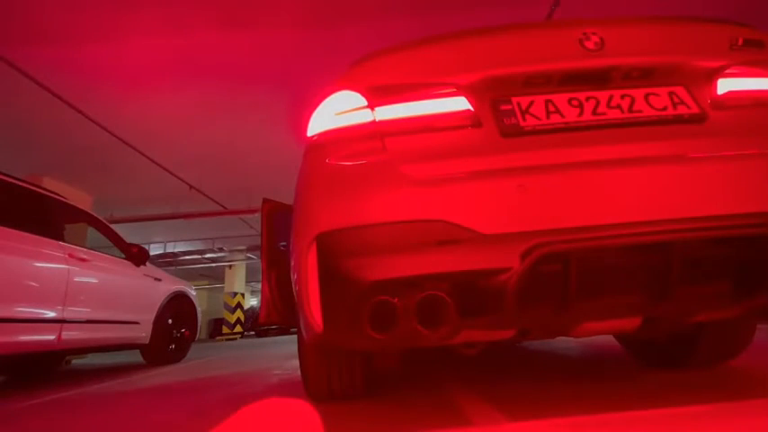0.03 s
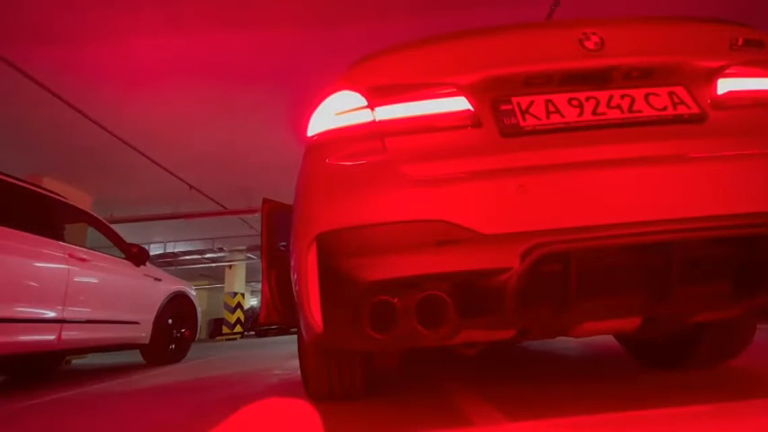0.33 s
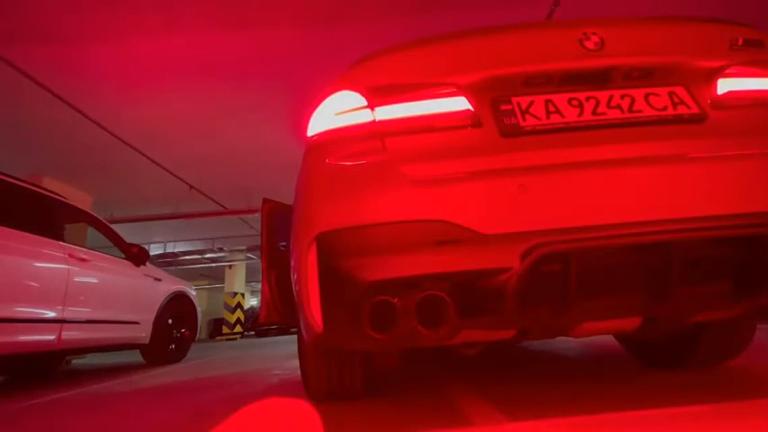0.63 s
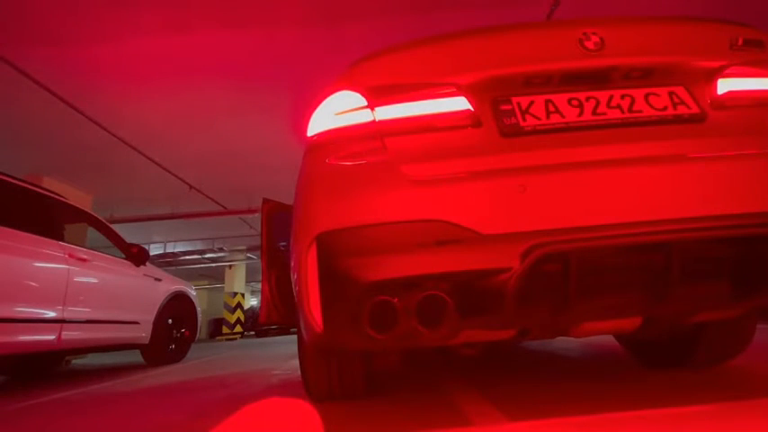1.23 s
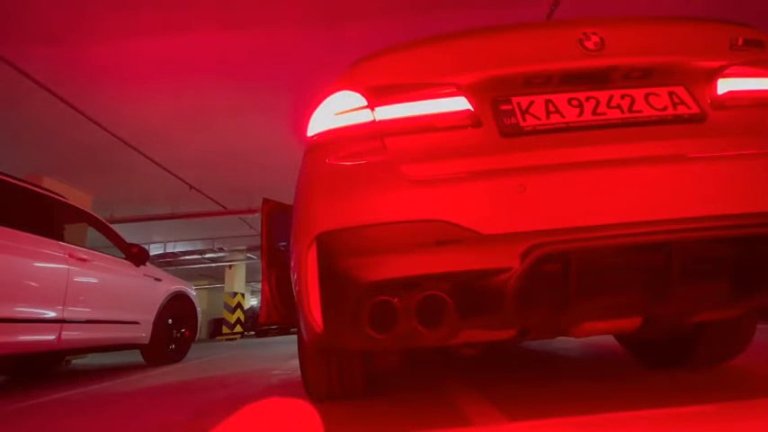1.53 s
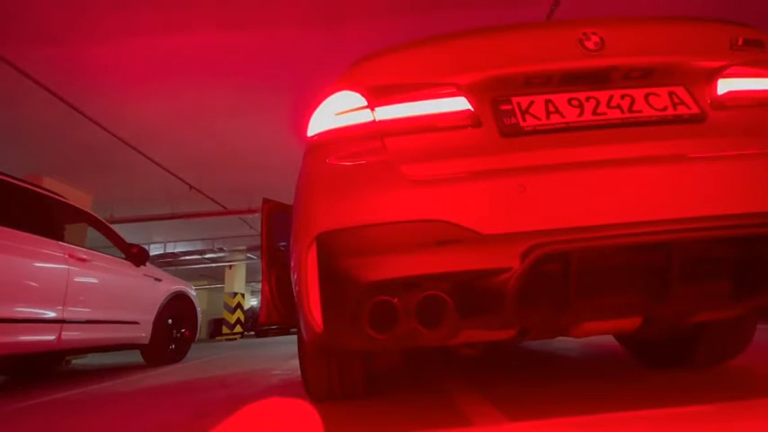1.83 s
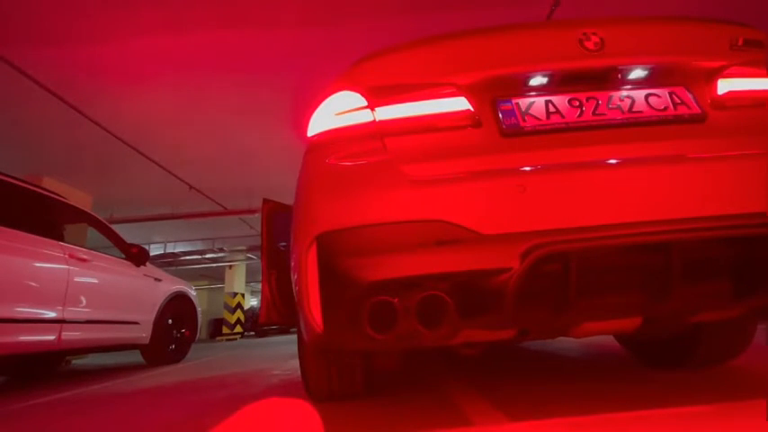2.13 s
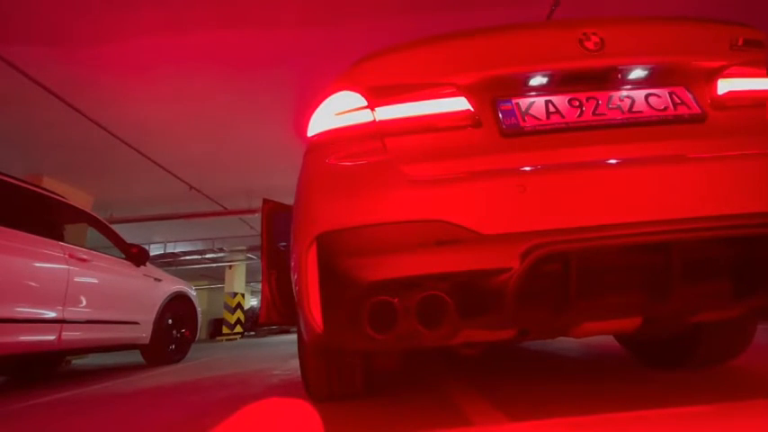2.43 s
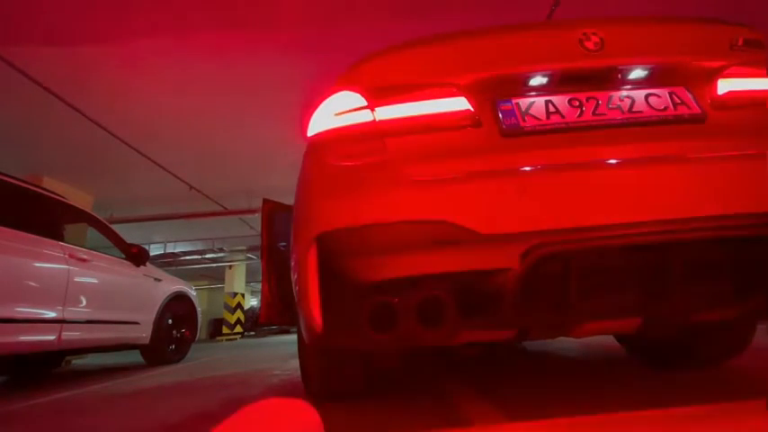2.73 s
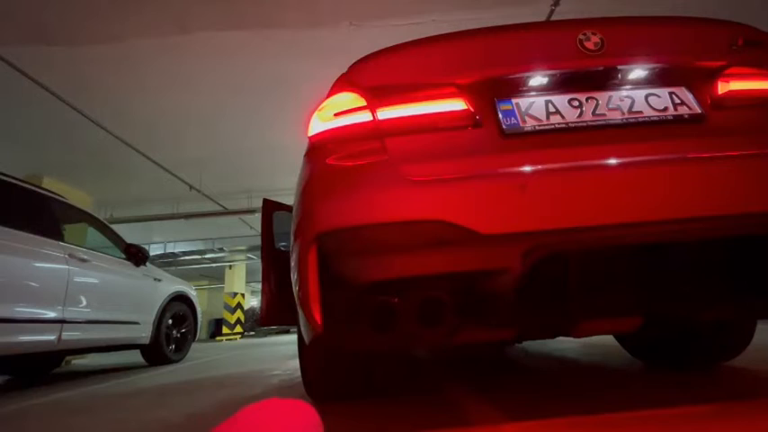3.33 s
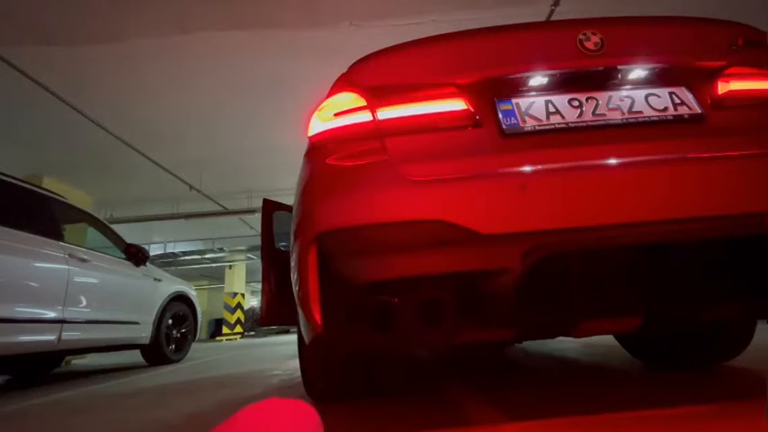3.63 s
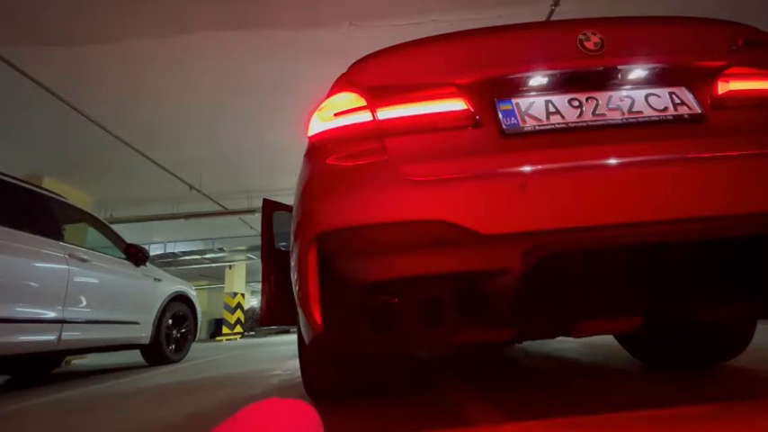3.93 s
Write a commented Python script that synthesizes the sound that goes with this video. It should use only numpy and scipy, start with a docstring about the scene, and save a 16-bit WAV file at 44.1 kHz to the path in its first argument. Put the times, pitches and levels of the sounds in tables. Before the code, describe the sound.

A car engine starts with a popping exhaust flare, then idles deeply in a car park.

```python
"""A V8 starts from cold in a concrete car park, heard from just behind its tailpipes.
Soft clunks sound in the car over faint ventilation. At 1.1 s the pinion clacks in; the starter whirrs
and compression strokes thump in the exhaust. Near 1.8 s the engine catches, coughing and popping.
The revs peak at 2.1 s, then sink to a loud, lumpy fast idle, each firing a pulse and a puff of gas.
Throughout, the low ceiling and walls answer and a limiter holds the peaks."""
import sys
import numpy as np
from scipy import signal
from scipy.fft import rfft, irfft, next_fast_len
from scipy.io import wavfile
from scipy.ndimage import uniform_filter1d, minimum_filter1d, map_coordinates

SR = 44100
rng = np.random.default_rng(int(sys.argv[2]) if len(sys.argv) > 2 else 0)


def inscribe(sig):
    """Save sig as 16-bit PCM at rate SR to the path in sys.argv[1].

    A 1-D sig is mono; a 2-D sig holds one channel per row.
    Samples are clipped to [-1, 1] before scaling.
    """
    pcm = np.round(np.clip(np.atleast_2d(sig).T, -1, 1) * 32767)
    wavfile.write(sys.argv[1], SR, pcm.astype(np.int16))


N = 176400

BOOM_HZ, BOOM_T60_S, BOOM_ATTACK_S = 57.55, 0.23, 0.0069  # lowest pipe resonance
ANTIPHASE = np.array([[1], [-1]])  # left, right

# engine speed: time_s, firing_hz
FIRING_RATE = [(1.8, 56), (1.85, 79), (1.88, 88), (1.92, 89), (1.96, 111), (2.03, 129), (2.12, 139),
               (2.19, 135.5), (2.26, 129), (2.4, 116.5), (2.52, 109.7), (2.68, 103.8), (2.82, 103.4),
               (2.91, 100.7), (3.15, 100.1), (3.4, 97.6), (3.6, 96.2), (4, 95)]
# eight cylinders in firing order: bark_db, rasp_db, late_s
CYLINDER_FIRINGS = [(3.5, 5, 0.00025), (-10.5, 0.5, 0.00078), (1.5, 6.5, 0.002053), (-1, 1.5, 0.002826),
                    (-5, 4, 0.00063), (-9, 3.5, 0.00012), (-9, 4, 0.001486), (-6.5, -1, 0.000089)]
# once-per-cycle surge: time_s, depth_db
CHUG_DEPTH = [(2.45, -1.5), (2.7, 0.5), (3.35, 4.5), (3.7, 1), (4, -0.5)]
# exhaust envelopes, each relative to its layer's gain: time_s, level_db
DRONE_LEVEL = [(1.78, -26), (1.84, -8), (1.93, -6.5), (2.2, -8), (2.42, -10), (2.55, -13.5), (2.7, -23.5),
               (3.0, -20), (3.25, -13), (3.5, -12), (4, -10)]
THROB_LEVEL = [(1.75, -38), (1.85, -35), (2.0, -24), (2.25, -21), (2.36, -23), (2.6, -17), (3.0, -17.5),
               (3.5, -18), (4, -22)]
BARK_LEVEL = [(1.66, -24.5), (1.75, -21), (1.79, -9.5), (1.84, -14), (1.97, -15.5), (2.06, -21),
              (2.24, -27), (2.39, -14.5), (2.59, -21), (3.0, -22), (4, -26.5)]
RASP_LEVEL = [(1.78, -11), (1.8, -23), (1.88, -17.5), (2.05, -25.5), (2.2, -31.5), (2.37, -24),
              (2.45, -19.5), (2.53, -29.5), (2.8, -24.5), (3.12, -25), (3.4, -27.5), (4, -27)]
HISS_LEVEL = [(1.76, -17.5), (1.78, -21.5), (1.85, -23.5), (1.91, -29), (2.1, -34), (2.2, -38),
              (2.46, -36.5), (2.53, -38), (2.84, -34.5), (4, -36.5)]
# engine-cycle harmonics: order, level_db
THROB_HARMONICS = [(3, -24), (4, -3), (5, 1), (7, 4.5), (9, -4.5)]
UPPER_HARMONICS = [(12, -10), (13, -11.5), (16, -2.5), (20, -4), (24, -8), (28, -12), (32, -15.5),
                   (36, -15), (40, -13), (43, -25), (48, -14.5)]
# exhaust spectra: freq_hz, gain_db
RUMBLE_SPECTRUM = [(20, -19), (36, -2), (48, -13), (62, 8), (85, -11.5), (200, -27.5), (600, -82)]
BARK_SPECTRUM = [(60, -89.5), (120, 4.5), (160, 2), (215, -2.5), (265, -9), (330, -6), (440, -7.5),
                 (490, -7), (530, -2.5), (595, -3.5), (680, -12.5), (850, -22), (1500, -61)]
RASP_SPECTRUM = [(400, -26), (850, -9), (950, -2.5), (1040, 5.5), (1130, -0.5), (1230, -3.5), (1420, -10.5),
                 (1550, -4.5), (1700, -11), (1900, -22), (2900, -21), (3400, -35), (6000, -43)]
HISS_SPECTRUM = [(900, -54.5), (2000, 1.5), (2900, 2.5), (3400, -4.5), (4300, 2), (5000, 2), (6200, 0),
                 (7500, -2), (10700, -3.5), (11500, -13), (12300, -20)]
# compression strokes and first firings: start_s, level_db
THUMP_EVENTS = [(1.085, -16), (1.155, -12.5), (1.248, -10), (1.262, -5.5), (1.337, -8.5), (1.41, -6),
                (1.485, -9), (1.549, -8.5), (1.616, 2), (1.674, 3), (1.713, 7.5), (1.752, 0), (1.78, 0.5),
                (1.797, -2.5)]
# hard firings as the engine catches: start_s, level_db
COUGH_EVENTS = [(1.574, -15), (1.703, -10), (1.827, -3), (1.843, -10), (1.891, -10), (1.944, -26),
                (1.974, -16), (2.107, -14)]
# tailpipe cracks: start_s, level_db
POP_EVENTS = [(1.762, -6), (1.853, -13), (1.874, -13), (1.896, -12), (1.949, -12), (1.985, -15),
              (2.428, -19), (2.435, -9), (2.470, -12), (2.58, -16), (2.620, -14), (2.638, -13.5),
              (2.697, -17), (2.715, -12), (2.7913, -9), (2.8688, -10), (2.892, -11.5), (2.95, -10.5),
              (3.0287, -12), (3.107, -18), (3.130, -11), (3.187, -12), (3.269, -10), (3.351, -13),
              (3.434, -14.5), (3.515, -11.5), (3.598, -14), (3.619, -20), (3.7662, -21), (3.787, -13.5),
              (3.809, -15.5), (3.933, -16)]
# starter gear whine: time_s, pitch_hz, level_db
GEAR_WHINE = [(1.04, 300, -59), (1.09, 323.4, -36), (1.2, 322.4, -22), (1.235, 368.5, -17.5),
              (1.265, 371.4, -25), (1.295, 346, -19), (1.32, 353.5, -40), (1.345, 385, -14.5),
              (1.38, 388, -21), (1.43, 403.8, -28), (1.51, 440, -27), (1.64, 381.4, -31.5),
              (1.7, 359.6, -32), (1.85, 389, -44)]
# starter whirr envelope: time_s, level_db
WHIRR_LEVEL = [(1.0, -72), (1.045, -55), (1.06, -30), (1.082, -17), (1.11, -23), (1.19, -27), (1.25, -25.5),
               (1.5, -27), (1.55, -29), (1.58, -26.5), (1.68, -29.5), (1.76, -29.5)]
# starter whirr spectrum: freq_hz, gain_db
WHIRR_SPECTRUM = [(60, -39), (100, 4.5), (190, -13), (370, -6.5), (510, -11.5), (660, -10.5), (880, -17.5),
                  (1240, -17), (2000, -18.5), (2830, -18.5), (3400, -21.5), (6200, -23), (11000, -25),
                  (14000, -44)]
# starter housing resonances: centre_hz, width_hz, gain_db
HOUSING_MODES = [(1016, 45, 2), (1520, 210, -2.5), (1940, 70, -1), (2526, 54, -4.5), (2890, 64, -7.5),
                 (6115, 140, 0)]
# knocks in the car: start_s, thud_db, latch_db
CLUNK_EVENTS = [(0.519, -49.5, -50), (0.676, -50.5, -66), (.705, -66, -58), (.94, -52.5, -60),
                (1.001, -37.5, -54)]
# knock and ventilation spectra: freq_hz, gain_db
THUD_SPECTRUM = [(30, -9), (70, 8), (130, 9), (220, -7.5), (440, -3), (560, -6.5), (750, -8), (1100, -25),
                 (3000, -33), (10000, -46)]
LATCH_SPECTRUM = [(250, -29), (440, 2), (540, -3), (660, -2), (820, -2), (1100, -24), (3000, -32),
                  (10000, -34)]
VENT_SPECTRUM = [(15, -37), (25, -4), (64, -0.5), (207, -15), (241, -25), (353, -34), (391, -21),
                 (545, -36), (5670, -46.5), (11000, -47), (14300, -71), (22000, -120)]
# floor-to-ceiling standing waves: centre_hz, width_hz, gain_db
ROOM_MODES = [(311.4, 9.7, 3.5), (343.7, 16, 6), (387.6, 7.1, 0.5), (442.3, 12.5, 3.5), (518.4, 13, -1),
              (593.6, 5.3, 3)]
# car park reverberation: freq_hz, t60_s
HALL_DECAY = [(100, 0.66), (1000, 1), (4000, 0.36), (11000, 0.59)]


def exhaust(firings):
    """Each firing sends a pulse and a puff of gas down the pipe: bark, rasp and hiss."""
    index = np.arange(np.ceil(firings[0]), firings[-1]).astype(int)
    bark_db, rasp_db, late_s = np.array(CYLINDER_FIRINGS)[index % len(CYLINDER_FIRINGS)].T
    jitter, bark_stray, rasp_stray = np.clip(rng.standard_normal((1024, 3)), -2, 2)[index].T
    start_s = np.interp(index, firings, np.arange(N) / SR) + late_s + .00008 * jitter
    unevenness = np.interp(start_s, [3.1, 3.7], [1, .45])  # cylinders even out at idle
    bark_pulses = impulses(start_s, unevenness * bark_db + 2.5 * bark_stray)
    rasp_pulses = impulses(start_s, rasp_db + 1.1 * rasp_stray)

    roughness = 0.51 + 2.4 * (1 - fade_in(2.07, 0.032))  # cold cylinders burn raggedly
    bark = coloured(unit_rms(bark_pulses) + roughness * puffs(bark_pulses, t60_s=0.03), BARK_SPECTRUM)
    bark = unit_rms(bark / np.sqrt(1 + roughness ** 2))
    bark *= amp(curves(BARK_LEVEL)[0] + 1) * fade_in(1.66, .02)

    rasp_gain = amp(curves(RASP_LEVEL)[0]) * fade_in(1.785, 0.0091)
    rasp = coloured(unit_rms(rasp_pulses) + 0.9 * puffs(rasp_pulses, t60_s=0.018), RASP_SPECTRUM)
    scatter = amp(-30) * coloured(puffs(rasp_pulses, t60_s=0.14), RASP_SPECTRUM) * ANTIPHASE

    flow = 1 + 0.97 * unit_rms(swells(rasp_pulses, t60_s=0.031, attack_s=0.00026))
    gas = coloured(flow * rng.standard_normal((2, N)), HISS_SPECTRUM)
    gas *= amp(curves(HISS_LEVEL)[0]) * fade_in(1.765, 0.011)

    bark = hall(standing_waves(bark), wet_db=-7, early_db=-2)
    rasp = hall(rasp * rasp_gain, wet_db=-7, early_db=-6) + scatter * rasp_gain
    hiss = hall(gas[0], wet_db=-5, early_db=-1, early_t60_s=.04) + amp(-5) * gas[1] * ANTIPHASE
    return chug(firings) * bark * amp([[-1], [1]]) + rasp * amp([[-2.2], [1.8]]) + hiss


def drone(firings, boom_width_hz=12, flare_db=-17, idle_db=-31):
    """Deep firing tone; unequal cylinders throb and gas rumbles near the lowest pipe resonance."""
    cycle_rad, cycle_hz = engine_cycle(firings)

    def tone(order, stray_rad):
        return np.sqrt(2) * np.sin(order * cycle_rad + np.pi + stray_rad * wobble(13))

    firing_tone = amp(curves(DRONE_LEVEL)[0] + wobble(25)) * tone(len(CYLINDER_FIRINGS), .08)
    throb = np.zeros(N)
    for order, level_db in THROB_HARMONICS:
        detuning = (order * cycle_hz - BOOM_HZ) / boom_width_hz
        throb += amp(level_db + 1.2 * wobble(9)) * tone(order, .2) / np.hypot(1, detuning)
    throb *= amp(curves(THROB_LEVEL)[0])
    rumble_db = flare_db + (idle_db - flare_db) * fade_in(2.55, .1)
    rumble = amp(rumble_db) * coloured(rng.standard_normal(N), RUMBLE_SPECTRUM)
    return fade_in(1.805, 0.018) * (firing_tone * chug(firings) ** 0.27 + throb + rumble)


def overtones(firings):
    """Engine-cycle harmonics swell as they glide through pipe and room resonances."""
    cycle_rad, cycle_hz = engine_cycle(firings)
    tones = np.zeros(N)
    for order, level_db in UPPER_HARMONICS:
        gain = amp(level_db + log_interp(BARK_SPECTRUM, order * cycle_hz) + 2.2 * wobble(12))
        phase_rad = order * cycle_rad + 2 * np.pi * rng.random() + .35 * wobble(20)
        tones += gain * np.sqrt(2) * np.sin(phase_rad)
    envelope = amp(-8.5 + 0.45 * curves(BARK_LEVEL)[0]) * fade_in(1.77, 0.027)
    rev_gain = (cycle_hz / cycle_hz[-1]) ** 1.02
    return standing_waves(tones * envelope * rev_gain)


def firing_count(zero_s=3.029):
    """Running count of firings; zero where the loudest cylinder fires."""
    firings = np.cumsum(curves(FIRING_RATE)[0]) / SR
    return firings - np.interp(zero_s * SR, np.arange(N), firings)


def engine_cycle(firings):
    """One cycle per eight firings: phase_rad, rate_hz."""
    cylinders = len(CYLINDER_FIRINGS)
    return 2 * np.pi * firings / cylinders, curves(FIRING_RATE)[0] / cylinders


def chug(firings, lag_firings=1.33):
    """Gain of the exhaust's surge, once per cycle, just after the loudest cylinder."""
    cycle_rad, _ = engine_cycle(firings - lag_firings)
    return amp(curves(CHUG_DEPTH)[0] * (np.cos(cycle_rad) - .2))


def puffs(pulses, t60_s):
    """A burst of gas noise per pulse."""
    return unit_rms(swells(pulses, t60_s, attack_s=0.00037)) * rng.standard_normal(N)


def thumps():
    """Single pushes of gas ring the lowest pipe resonance."""
    t = np.arange(SR // 2) / SR
    envelope = amp(-60 * t / BOOM_T60_S) * (1 - np.exp(-t / BOOM_ATTACK_S))
    boom = -np.sin(2 * np.pi * BOOM_HZ * t) * envelope
    return signal.fftconvolve(impulses(*np.transpose(THUMP_EVENTS)), boom)[:N]


def coughs():
    """Single violent firings bark through the pipe."""
    start_s, level_db = np.transpose(COUGH_EVENTS)
    blows = coloured(impulses(start_s, level_db), BARK_SPECTRUM)
    blows *= amp(level_db.max()) / np.abs(blows).max()
    return hall(standing_waves(blows, gain_db=0), wet_db=-12, early_db=-8)


def pops(ring_hz=1230, swell_s=0.0018, sag_hz_per_s=45000, gain_db=1):
    """Late-burning fuel cracks in the tailpipe: a brief ring, sagging in pitch."""
    t = np.arange(SR // 80) / SR
    swell = (t / swell_s * np.exp(1 - t / swell_s)) ** 2
    cracks = np.zeros(N + SR)
    for start_s, level_db in POP_EVENTS:
        pitch_hz = ring_hz * (1 + 0.036 * rng.standard_normal()) - sag_hz_per_s * (t - swell_s)
        ring = np.sin(2 * np.pi * np.cumsum(pitch_hz) / SR)
        cracks[round(start_s * SR):][:len(t)] += amp(level_db + gain_db) * swell * ring
    return hall(cracks[:N], wet_db=-12, early_db=-10) * amp([[-1.7], [1.3]])


def starter():
    """Meshing gears whine and rattle the housing until the engine catches."""
    pitch_hz, level_db = curves(GEAR_WHINE)
    mesh_rad = 2 * np.pi * np.cumsum(pitch_hz) / SR + .9 * wobble(80)
    whine = np.sqrt(2) * np.sin(mesh_rad) * amp(level_db + 1.9 * wobble(50.15)) * fade_in(0.95, .01)
    rattle = rng.standard_normal((2, N)) * amp(1.6 * wobble(300) + 1.11 * wobble(24.94))
    housing = unit_rms(resonances(rattle, HOUSING_MODES))
    whirr = highpass(amp(5) * coloured(rattle, WHIRR_SPECTRUM) + amp(-9.5) * housing, 130)
    whirr *= amp(curves(WHIRR_LEVEL)[0]) * fade_in(0.96, 0.014) * (1 - fade_in(1.77, 0.011))
    scatter = amp(-12.5) * highpass(whirr[1], 350) * ANTIPHASE
    load = compression_load()
    whine = hall(whine * load, wet_db=-11, early_db=-5)
    whirr = hall(whirr[0] * load ** .5, wet_db=-9, early_db=-3, early_t60_s=.04)
    return whine + whirr + scatter


def compression_load(depth=0.33):
    """Gain swing as the starter labours against each compression stroke."""
    start_s, _ = np.transpose(THUMP_EVENTS)
    load = swells(impulses(start_s, np.zeros_like(start_s)), t60_s=0.13, attack_s=0.017)
    return 1 + depth * (2 * load / load.max() - 1)


def pinion_clack(start_s=1.076, level_db=-22):
    """The pinion strikes the ring gear and rings the starter housing."""
    envelope = swells(impulses([start_s], [level_db]), t60_s=0.15, attack_s=0.00092)
    ring = unit_rms(resonances(rng.standard_normal(N), HOUSING_MODES))
    return hall(envelope * ring, wet_db=-10, early_db=-4, early_t60_s=.04)


def clunks():
    """Dull knocks in the car before cranking, each with a light latch rattle."""
    start_s, thud_db, latch_db = np.transpose(CLUNK_EVENTS)
    thud = coloured(stereo_noise(side_db=-15), THUD_SPECTRUM)
    thud *= swells(impulses(start_s, thud_db), t60_s=0.24, attack_s=0.026)
    latch = coloured(stereo_noise(side_db=5), LATCH_SPECTRUM)
    latch *= swells(impulses(start_s, latch_db), t60_s=0.18, attack_s=0.004)
    return amp(6) * thud + amp(-2) * latch


def ventilation():
    """Faint, wavering rumble of the car park's ventilation."""
    return amp(-63 + 3.2 * wobble(9.76)) * coloured(stereo_noise(side_db=-9), VENT_SPECTRUM)


def standing_waves(x, gain_db=-2.5):
    """x plus the floor-to-ceiling modes it leaves ringing."""
    return amp(gain_db) * (x + resonances(x, ROOM_MODES))


def hall(x, wet_db, early_db, early_t60_s=0.13, mono_below_hz=380):
    """Near walls and a concrete tail; bass reaches both sides alike."""
    freq_hz, frame_s, spectra = signal.stft(rng.standard_normal((2, SR)), SR, nperseg=256)
    decay = amp(-60 * frame_s / log_interp(HALL_DECAY, freq_hz)[:, None])
    tail = signal.istft(spectra * decay, SR, nperseg=256)[1][:, :SR]
    tail *= amp(wet_db) / np.linalg.norm(tail[0])
    t = np.arange(SR) / SR
    early = rng.standard_normal((2, SR)) * amp(-60 * t / early_t60_s) * (t > .002)
    early *= amp(early_db) / np.linalg.norm(early[0])
    mid, side = signal.fftconvolve(x[None], tail + early, axes=1)[:, :N]
    stereo = x + mid + highpass(side, mono_below_hz) * ANTIPHASE
    return stereo / np.sqrt(1 + amp(wet_db) ** 2 + amp(early_db) ** 2)


def amp(db):
    return 10 ** (np.asarray(db) / 20)


def unit_rms(x):
    return x / np.sqrt(np.mean(x ** 2) + 1e-20)


def log_interp(points, at_hz):
    """(freq_hz, value) points read on a log frequency axis."""
    freq_hz, values = np.transpose(points)
    return np.interp(np.log(at_hz + 1), np.log(freq_hz + 1), values)


def curves(rows):
    """One per-sample curve for each column after time_s."""
    time_s, *columns = np.transpose(rows)
    return [np.interp(np.arange(N) / SR, time_s, column) for column in columns]


def fade_in(centre_s, width_s):
    return .5 + .5 * np.tanh((np.arange(N) / SR - centre_s) / width_s)


def wobble(rate_hz):
    """Smooth random curve with knots at rate_hz."""
    grid = np.linspace(0, N, int(rate_hz * N / SR) * 6 + 8)
    spline = map_coordinates(rng.standard_normal(2048), [grid * rate_hz / SR], mode="wrap")
    return np.interp(np.arange(N), grid, spline)


def filtered(x, response):
    """x with its spectrum scaled by response(hz)."""
    size = next_fast_len(N + SR // 2)
    return irfft(rfft(x, size) * response(np.fft.rfftfreq(size, 1 / SR)), size)[..., :N]


def highpass(x, corner_hz):
    return filtered(x, lambda hz: hz ** 2 / (hz ** 2 + corner_hz ** 2))


def resonances(x, modes):
    """x through parallel band-pass resonators."""
    return filtered(x, lambda hz: sum(
        amp(gain_db) * 1j * hz * width_hz / (centre_hz ** 2 - hz ** 2 + 1j * hz * width_hz)
        for centre_hz, width_hz, gain_db in modes))


def coloured(x, spectrum, size=16384):
    """x through a minimum-phase filter, at rms 1."""
    cepstrum = irfft(np.log(amp(log_interp(spectrum, np.fft.rfftfreq(size, 1 / SR)))))
    cepstrum[1:size // 2] *= 2
    cepstrum[size // 2 + 1:] = 0
    ring = irfft(np.exp(rfft(cepstrum)))[:size // 2]
    return unit_rms(filtered(x, lambda hz: rfft(ring, 2 * (len(hz) - 1))))


def impulses(start_s, level_db):
    samples = np.clip(np.round(np.asarray(start_s) * SR), 0, N).astype(int)
    return np.bincount(samples, amp(level_db), N + 1)[:N]


def swells(pulses, t60_s, attack_s):
    """An attack-decay envelope per impulse."""
    t = np.arange(SR) / SR
    return signal.fftconvolve(pulses, amp(-60 * t / t60_s) * (1 - np.exp(-t / attack_s)))[:N]


def stereo_noise(side_db):
    mid, side = rng.standard_normal((2, N))
    return unit_rms(mid + amp(side_db) * side * ANTIPHASE)


def scene():
    """Engine, starter and background, in stereo."""
    firings = firing_count()
    low_end = (drone(firings) + chug(firings) * overtones(firings) + thumps()) * amp([[-.35], [.35]])
    engine = low_end + exhaust(firings) + coughs() + pops()
    return engine + pinion_clack() + starter() + clunks() + ventilation()


def record(dry, low_hz=29, ceiling=.96, knee_hz=11100, top_hz=12350):
    """Sub-bass cut, fast peak limiter, treble roll-off."""
    dry = filtered(dry, lambda hz: 1 - 1 / (1 + (hz / low_hz) ** 6))
    needed_gain = np.minimum(1, ceiling / (np.abs(dry).max(0) + 1e-9))
    gain = uniform_filter1d(minimum_filter1d(needed_gain, size=300), size=260)
    return filtered(dry * gain, lambda hz: amp(-.014 * np.maximum(hz - knee_hz, 0)) * (hz < top_hz))


dry = scene()
out = record(dry)
inscribe(out)
```